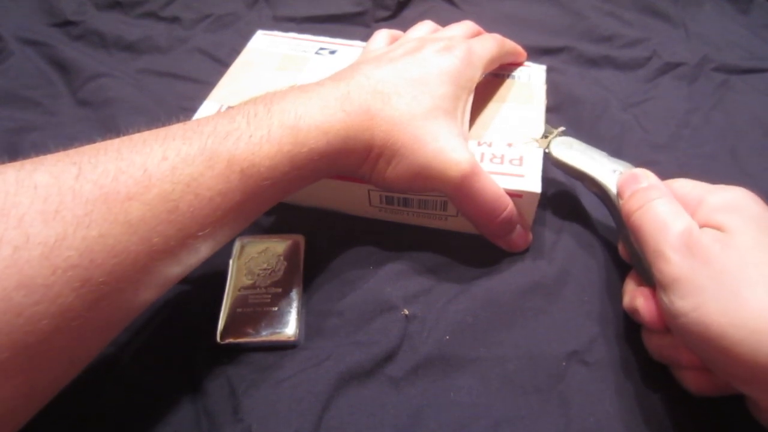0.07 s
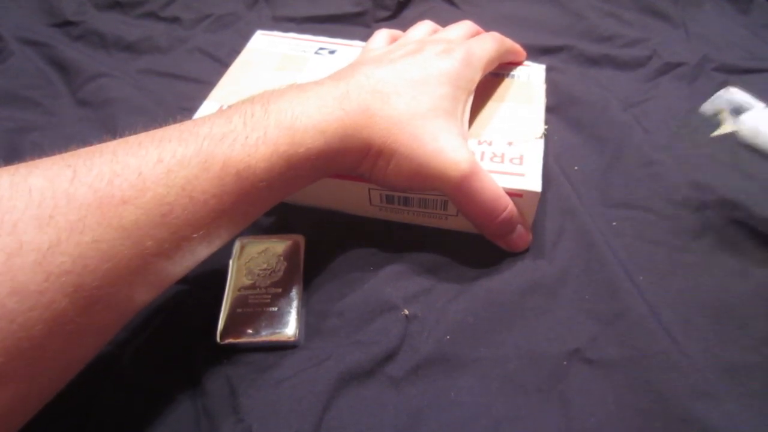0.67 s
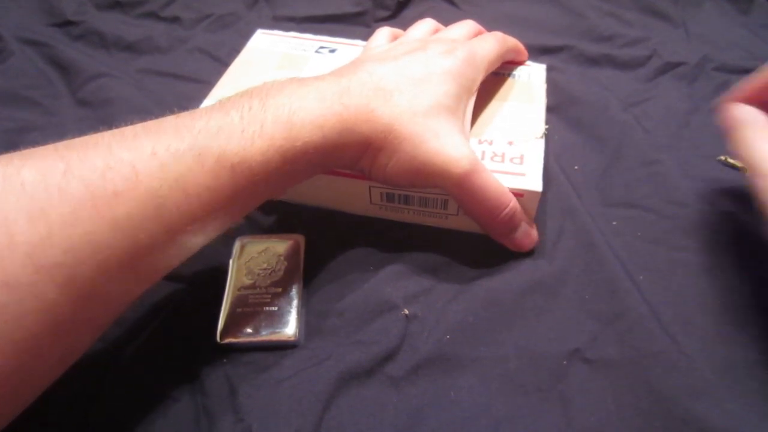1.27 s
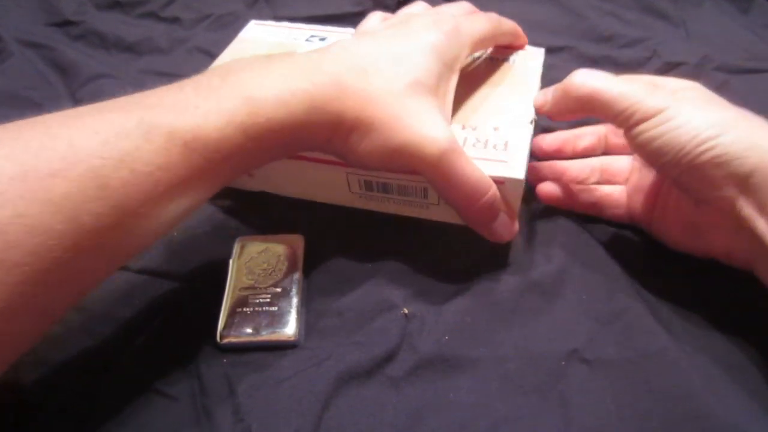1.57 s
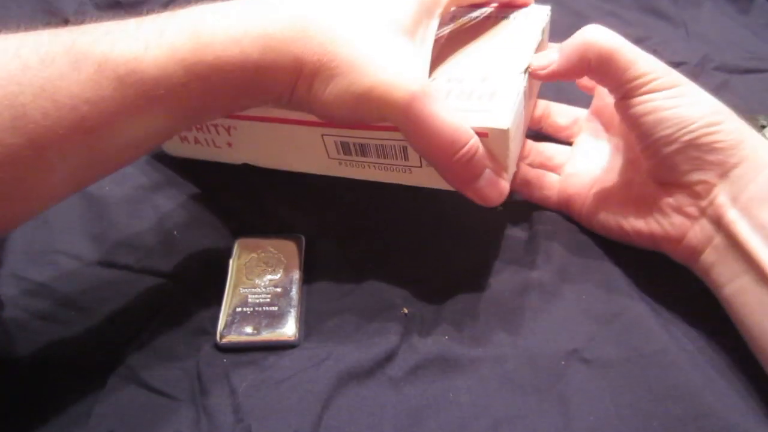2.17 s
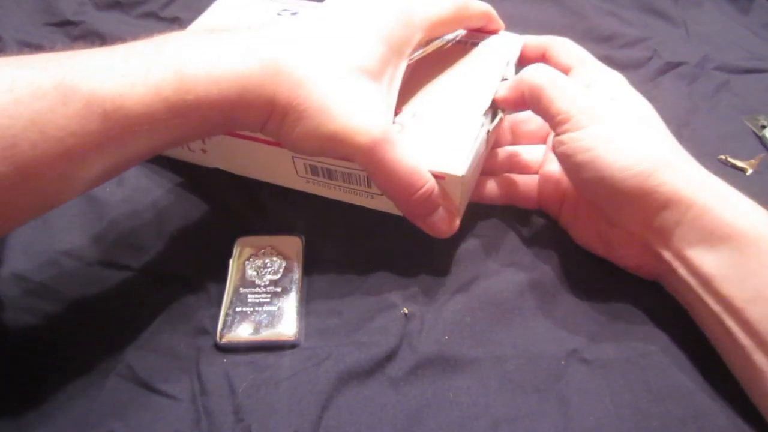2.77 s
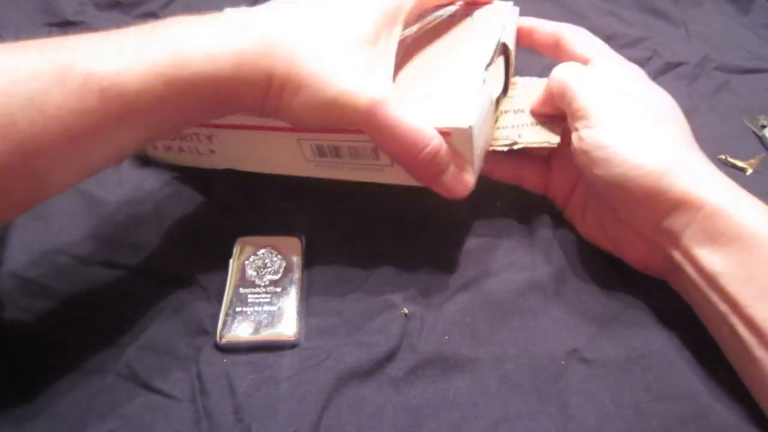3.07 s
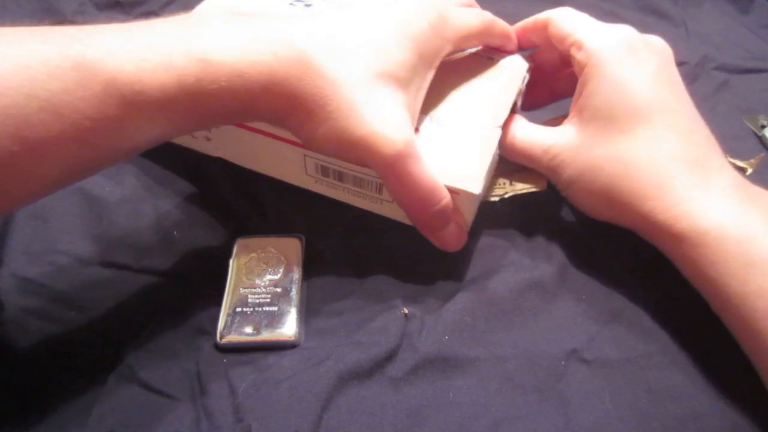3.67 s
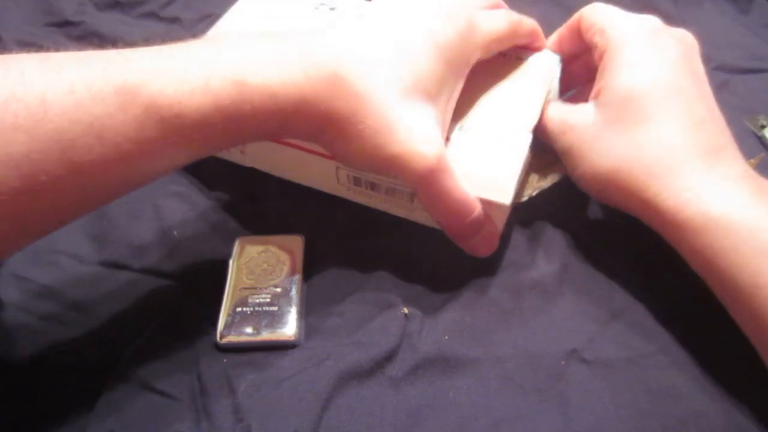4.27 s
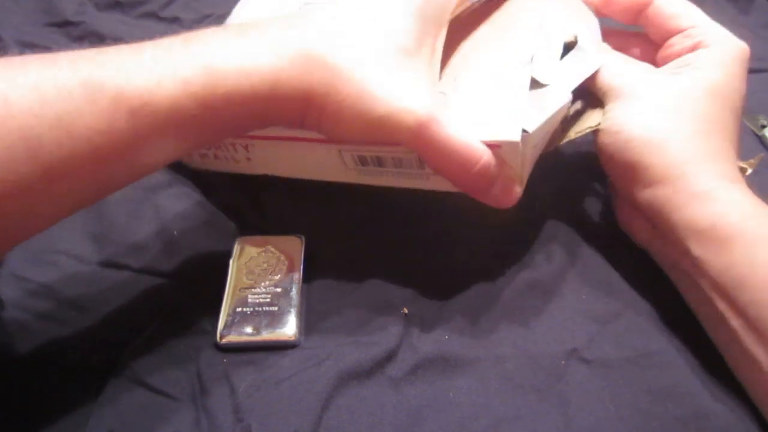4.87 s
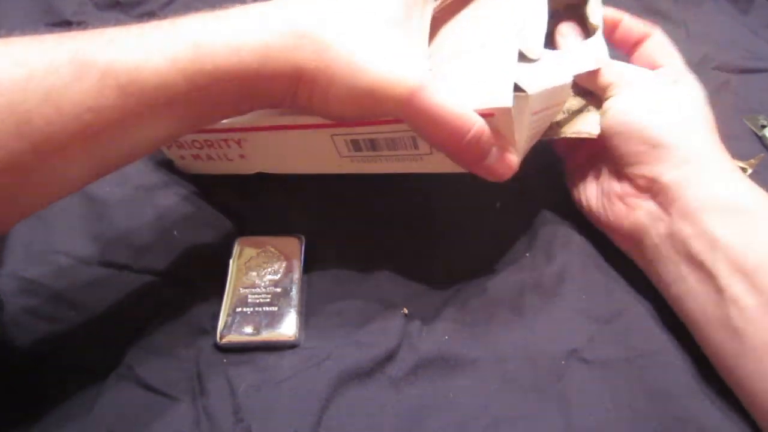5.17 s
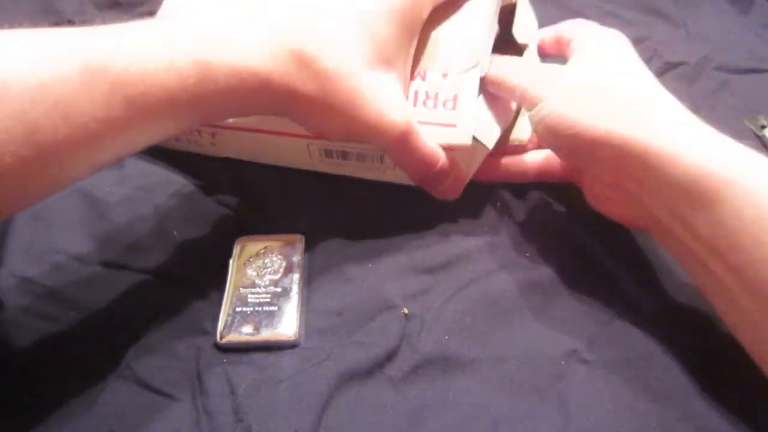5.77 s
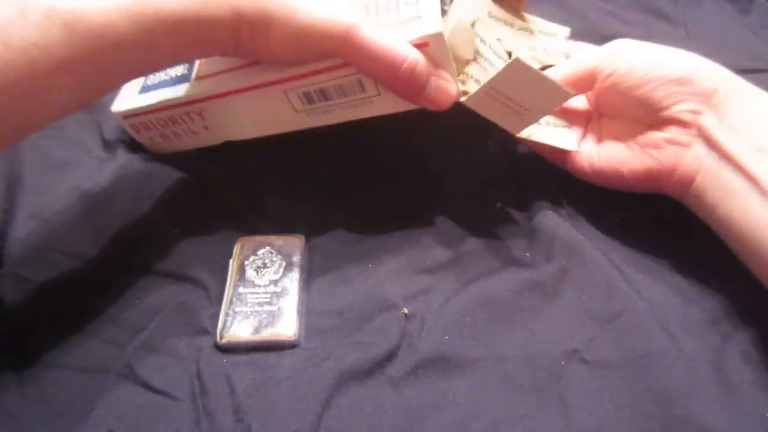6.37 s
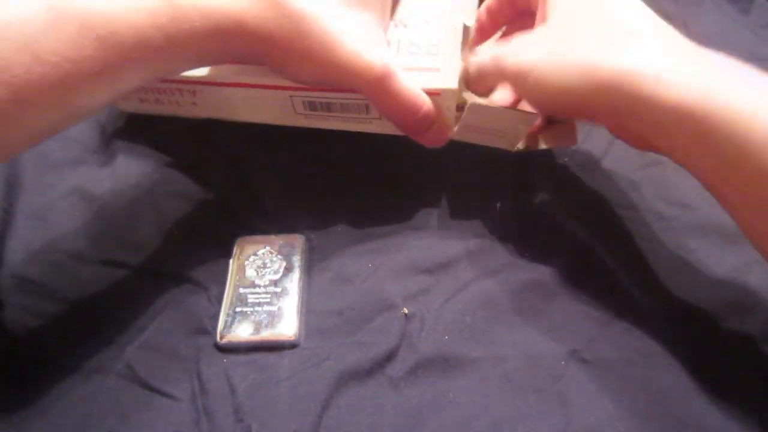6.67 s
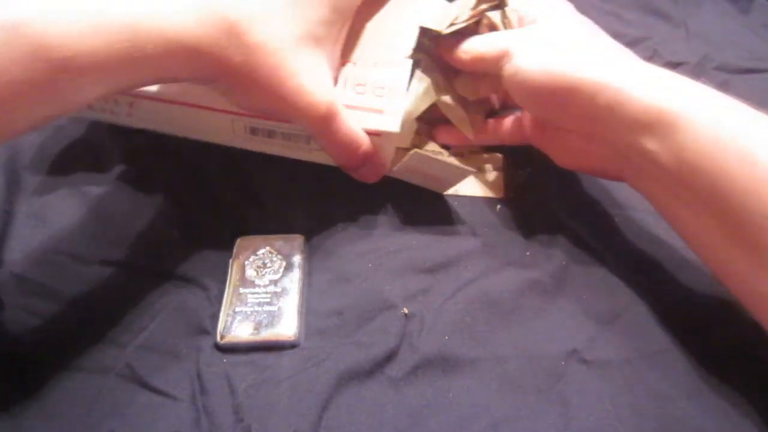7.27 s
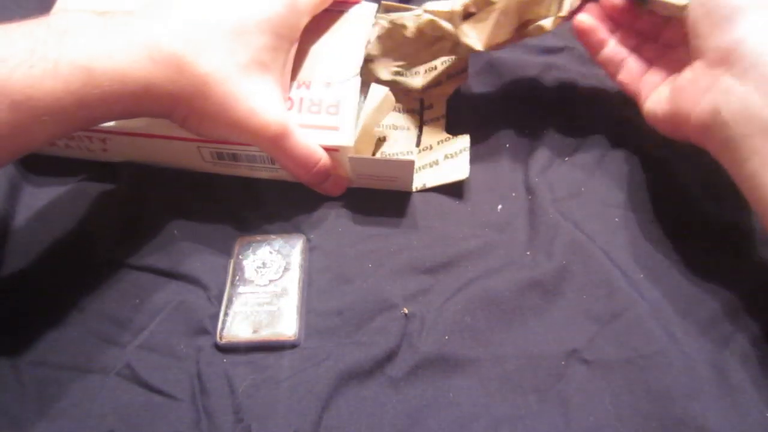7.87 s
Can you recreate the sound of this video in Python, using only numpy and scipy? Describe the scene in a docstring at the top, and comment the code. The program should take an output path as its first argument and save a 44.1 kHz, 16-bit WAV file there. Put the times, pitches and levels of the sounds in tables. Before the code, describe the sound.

A knife briefly rasps through cardboard, then fingers scrape and snap the box open and pull out rustling packing paper.

```python
"""A knife rasps through the end of a cardboard mailing box, scrapes free and rings briefly.
Fingers scrape and pry by stick-slip friction, the glued seal fractures ridge by ridge, and the flaps
buckle open, each release exciting the resonances of flap and box. Last, crumpled packing paper is
dragged out, rustling as its creases flip. The box lies close by on a cloth-covered table, where it
thuds softly; a small room adds a short reverberation and a low noise."""
import sys
import numpy as np
from scipy import signal
from scipy.fft import rfft, irfft, next_fast_len
from scipy.io import wavfile
from scipy.ndimage import map_coordinates

SR = 44100
rng = np.random.default_rng(int(sys.argv[2]) if len(sys.argv) > 2 else 0)


def waveform_to_disk(signal):
    """Save audio, clipped to [-1, 1], as 16-bit WAV at the path in sys.argv[1]."""
    frames = np.transpose(np.atleast_2d(signal))
    scaled = np.clip(frames, -1, 1) * 32767
    samples = np.round(scaled).astype(np.int16)
    wavfile.write(sys.argv[1], SR, samples)


N = 349272
STEP = 32  # samples per step of a stroke's envelope


# modes of the box walls and enclosed air: (frequency [Hz], bandwidth [Hz], gain [dB])
BOX_MODES = [(110, 35, -8), (160, 60, -11), (285, 120, -3), (380, 150, 0), (500, 130, -5)]
# spectrum of breaking fibres: (frequency [Hz], relative level [dB])
CRACK_SPECTRUM = [(1500, 6), (2700, 16), (4200, 9.5), (7000, 8), (9500, 0.5), (11800, -16), (13500, -8),
                  (16000, -28)]
# the cardboard buckles or slips free:
# (time [s], knock level [dB], pop level [dB], crack level [dB], flap frequency [Hz], crush time [s])
SNAPS = [(0.1134, -37, -32, -39, 925, 0.00012), (0.487, -34.5, -32.5, -49, 1270, 0.0043),
         (0.759, -47, -46.5, -64, 760, .0007), (1.2436, -38, -41, -52, 720, 0.00035),
         (1.4597, -31, -24, -46, 714, 0.0002), (1.751, -39, -33.5, -40, 1370, 0.0069),
         (1.819, -40, -48, -66, 815, 0.0035), (1.941, -24.5, -22.5, -33, 796, 0.0024),
         (2.2402, -32, -37.5, -47, 1240, 0.0049), (2.3812, -23.5, -26, -36, 800, 0.0018),
         (2.966, -26, -20, -31, 1186, 0.0028), (3.0198, -24.5, -20.5, -29, 1030, 0.0022),
         (3.583, -23, -27.5, -26.5, 930, 0.0061), (3.6323, -17.5, -21, -28.5, 960, 0.001),
         (3.647, -47, -28.5, -33, 1370, 0.0011), (4.6742, -15, -13.5, -24, 865, 0.005),
         (5.018, -28, -18.5, -27.5, 1270, 0.0013), (5.0312, -24, -20.5, -36, 1010, 0.0028),
         (5.054, -32.5, -25.5, -33, 1240, 0.002), (5.2012, -27, -30, -32, 1410, 0.0012),
         (5.2277, -44, -23.5, -32.5, 1900, 0.0029), (5.2635, -29, -28, -31, 1760, 0.0023),
         (5.427, -27.5, -25.5, -29, 1380, 0.0036), (5.7105, -38, -26.5, -38, 910, 0.0016),
         (5.7585, -32, -15.5, -54, 1370, 0.00022), (5.7608, -17.5, -21, -28, 965, 0.0092),
         (5.9894, -21.5, -10.5, -24.5, 826, 0.00027), (6.1876, -33, -23, -33.5, 900, 0.0057),
         (6.7119, -23, -27.5, -41, 866, 0.004), (6.7603, -23.5, -27, -56, 686, 0.0017),
         (6.8581, -29, -26, -29.5, 670, 0.0077), (7.107, -22.5, -21, -27, 900, 0.002),
         (7.2567, -24, -16, -47, 774, 0.0023), (7.3044, -24.5, -17.5, -48, 726, 0.004),
         (7.795, -32, -22, -30, 790, 0.0059), (7.823, -32, -25, -33, 820, 0.0041),
         (7.844, -80, -26.5, -37, 836, 0.0027), (7.909, -28, -23, -31.5, 825, 0.01)]
def snapping(size=4096):
    """Buckling frees stored elastic energy: the flap pops, the box knocks and fibres crack."""
    out, lead = np.zeros(N), size // 4
    t = (np.arange(size) - lead) / SR
    for s, knock_db, pop_db, crack_db, pop_hz, crush_s in SNAPS:
        # a quick snap is one clean impulse, a slow crush is mostly small slips around it
        fade_s = max(crush_s, 1 / SR) * np.where(t < 0, 0.65, 1)
        drive = 0.26 * np.tanh(crush_s / 0.002) * rng.standard_normal(size) * np.exp(-np.abs(t) / fade_s)
        drive[lead] += 1
        drive = whiten(fold_echoes(drive, echo_db=-8.5, t60=0.012), share=0.3)
        push = top_wall(drive)
        flap = resonate(push, [(pop_hz, 320, 0), (1.35 * pop_hz, 900, -5)])
        pop = amp(pop_db) * burst(band(flap, 568, 2.35 * pop_hz))
        # slow, long bending waves reach the box walls a moment later
        body = np.roll(resonate(push, BOX_MODES), round(0.001 * SR))
        knock = amp(knock_db) * burst(band(body, 120, 900, order=2))
        splinters = whiten(fold_echoes(drive, echo_db=1, t60=0.0041), share=0.45)
        fibres = coloured(splinters, CRACK_SPECTRUM)
        crack = amp(crack_db) * burst(band(fibres, 1100, 24000, order=2))
        add(out, s - lead / SR, pop + knock + crack)
    return out


# spectrum of the tearing seal: (frequency [Hz], relative level [dB])
SEAL_SPECTRUM = [(200, -18), (370, 2), (700, -3.5), (1150, 10), (2000, 0.5), (3000, -1.5), (4200, -7),
                 (6500, -7), (9500, -13.5), (11800, -24.5), (13800, -19), (16000, -32)]
# the seal catches, then gives way in one pull:
# (start [s], duration [s], level [dB], swell [dB], relative hiss [dB], relative body [dB])
RIPS = [(2.938, 0.028, -28.5, -4, 0, -2), (2.967, 0.092, -20.7, -1, -.8, -9.5)]
def ripping(ridges_per_s=155, jerk_decay_s=0.0025):
    """Intermittent fracture: each glued ridge gives way with a jerk and a spray of breaking fibres."""
    levels = stroke_gains(RIPS, attack_s=0.003, release_s=0.011, hiss_release_s=0.013)
    spacing, strength = rng.random((round(2 * ridges_per_s * N / SR), 2)).T
    onsets = np.cumsum(0.5 + spacing) / ridges_per_s
    t = np.arange(N) / SR + onsets[0]
    ridge = np.searchsorted(onsets, t, side="right") - 1
    jerks = amp(4 * strength[ridge]) * (0.3 + np.exp((onsets[ridge] - t) / jerk_decay_s))
    fibres = slips(rate=3500, spread_db=2.5, smooth=0.5)
    return friction(levels, SEAL_SPECTRUM, jerks * fibres, judder_db=1, judder_rate=460)


# spectrum of rubbed cardboard: (frequency [Hz], relative level [dB])
CARDBOARD_SPECTRUM = [(200, -5), (310, -4.5), (600, -4.5), (880, 2), (1200, 6), (1800, -0.5), (3800, -15),
                      (6000, -15), (9500, -23.5), (11800, -41.5), (13500, -34), (16000, -46)]
# the holding hand rubs the box, and torn edges make it hiss: (time [s], level [dB], relative hiss [dB])
GRIP = [(0, -50.5, -21), (.52, -49.5, -10.5), (.9, -65, -5), (1.4, -53, -9.5), (1.87, -60.5, -3),
        (2.2, -58.5, -9), (2.55, -49, -5.5), (3.5, -45, -3.5), (4.21, -55, 2.5), (4.5, -39.5, -5),
        (5.15, -45, -6.5), (5.85, -39.5, -8), (6.1, -47.5, -8.5), (6.3, -48.5, -3.5), (6.65, -62, -4)]
# slides over the cardboard:
# (start [s], duration [s], level [dB], swell [dB], relative hiss [dB], relative body [dB])
RUBS = [(0.0, 0.19, -46, -4, -7, -4.5), (.25, 0.24, -48.5, -11, -12.5, -2.5),
        (.4, 0.072, -35.5, 11, -9.5, -6), (1.47, 0.15, -46.5, -5, -13.5, -7),
        (1.946, 0.026, -34.5, -12, -7, -11.5), (2.04, 0.037, -38, 0.5, -11, -11),
        (2.25, 0.024, -40.5, -2, -9.5, 3), (2.385, 0.029, -36.5, -0.5, -3.5, 5.5),
        (2.63, 0.033, -36, 2, -5, -0.5), (2.68, 0.18, -43.5, -9, -19, 3), (3.33, 0.053, -52, 20, -3, 4),
        (3.565, 0.16, -42, -14, -4, -19), (3.75, 0.19, -44.5, -7.5, -1.5, -1.5),
        (3.997, 0.083, -39.5, 1, 3.5, -4), (4.293, 0.08, -37, -0.5, 0, 1), (4.45, 0.215, -42.5, 18, 2, -8),
        (4.69, 0.042, -36.5, 4.5, -2, -12), (4.803, 0.068, -33, 0, 1, -4),
        (5.018, 0.037, -26, -5, -5, -6.5), (5.208, 0.069, -33.5, -5, -3, -2),
        (5.394, 0.086, -33, -7.5, -7, -3), (5.585, 0.017, -29.5, -1.5, -4, -3.5),
        (5.705, 0.16, -33.5, -19, -7.5, -13), (5.885, 0.081, -34, 18, -7.5, -3.5),
        (6.14, 0.045, -42.5, -10, 0.5, 3.5), (6.365, 0.1, -43, 1, -7, -2), (6.55, 0.019, -51, -1, 3, 6.5)]
def scraping():
    """Stick-slip friction: blade, skin and flap edges cross the cardboard in a fine, dense grain."""
    rubs = stroke_gains(RUBS, attack_s=0.01, release_s=0.027, hiss_release_s=0.019)
    level, hiss = gain_curves(GRIP)
    grip = np.array([0.87 * level, level, hiss * level])
    grain = slips(rate=1700, spread_db=5, smooth=0.95)
    return friction(np.hypot(rubs, grip), CARDBOARD_SPECTRUM, grain, judder_db=1.5, judder_rate=110)


# spectrum of dragged paper: (frequency [Hz], relative level [dB])
PAPER_SPECTRUM = [(200, -7), (370, 0), (600, -9.5), (820, -2.5), (1100, -4.5), (2200, -5), (4000, -13.5),
                  (6500, -14), (9500, -20), (11800, -39), (13300, -32), (16000, -46)]
# tugs at the packing paper:
# (start [s], duration [s], level [dB], swell [dB], relative hiss [dB], relative body [dB])
TUGS = [(6.668, 0.022, -45.5, 9, -0.5, -18), (6.715, 0.16, -34.5, 4.5, -2, -1),
        (6.922, 0.033, -28, 1, -6, -4.5), (7.05, 0.15, -30, 3, -5, -3.5), (7.17, 0.14, -26.5, -1, -1, -5),
        (7.35, 0.17, -39.5, 14.5, -1, -6), (7.525, 0.13, -27.5, 7, -3, -6),
        (7.7, 0.2, -34.5, -5.5, -3.5, -5.5)]
def rustling():
    """Sliding friction: crumpled paper rustles as it drags along the inside of the box."""
    levels = stroke_gains(TUGS, attack_s=0.006, release_s=0.07, hiss_release_s=0.06)
    grain = slips(rate=1700, spread_db=5, smooth=0.6)
    return friction(levels, PAPER_SPECTRUM, grain, judder_db=1.6, judder_rate=120)


# loud creases in the packing paper: (time [s], level [dB])
CREASES = [(6.716, -33), (6.8052, -31), (6.8318, -34.5), (7.009, -40.5), (7.1, -35), (7.328, -29),
           (7.39, -23.5), (7.4273, -25), (7.523, -31.5), (7.565, -30), (7.591, -28), (7.62, -27),
           (7.6498, -29), (7.9009, -34)]
def crinkling():
    """Crackling noise: a few loud creases flip among many small ones in the paper and torn flaps."""
    out = small_creases(TUGS, rate=50, offset_db=-12) + small_creases(RUBS, rate=20, offset_db=-17)
    for s, db in CREASES:
        add(out, s, crease(db, hz=3300 * 2 ** (0.59 * rng.random())))
    return out


def small_creases(strokes, rate, offset_db):
    """Random buckling: creases flip during each stroke, louder where it hisses more."""
    out = np.zeros(N)
    for start, length, db, _, hiss_db, _ in strokes:
        for when, size, octaves in rng.random((round(rate * length), 3)):
            tick_db = db + hiss_db + offset_db + 14 * size ** 2
            add(out, start + when * length, crease(tick_db, hz=3000 * 2 ** octaves))
    return out


def crease(db, hz, size=1024):
    """Snap-through: one crease flips with a bright tick, too light to move the box."""
    flick = rng.standard_normal(size) * amp(-60 * np.arange(size) / SR / 0.008)
    tick = resonate(flick, [(hz, 1.4 * hz, 0), (7800, 2500, -9)])
    return amp(db) * burst(coloured(tick, [(200, -25), (1200, 0), (9000, 0), (11800, -19), (14000, -12)]))


# strokes of the knife: (start [s], duration [s], level [dB], swell [dB])
CUTS = [(0.0, 0.17, -52.5, 18), (0.252, 0.071, -43, 8), (0.378, 0.095, -39, 10)]
def slicing():
    """Forced vibration: the blade saws through fibres and the end flap rasps in one hollow band."""
    teeth = slips(rate=1600, spread_db=-4, smooth=0.37)
    sawing = per_sample(sum(stroke(*cut, attack_s=0.014, release_s=0.01) for cut in CUTS))
    return sawing * unit(band(teeth, 680, 1050, order=2))


# spectrum of the edge leaving the cut: (frequency [Hz], relative level [dB])
ZIP_SPECTRUM = [(2500, -18), (5000, -7), (6500, 2.5), (9800, -6), (11800, -21), (14500, -17)]
# modes of the blade: (frequency [Hz], level [dB], 60 dB decay time [s])
BLADE_MODES = [(1210, -39, 0.16), (1950, -37, 0.32), (2155, -38, 0.21), (4580, -52, 0.28)]
def blade_release(exit_s=0.483):
    """Free vibration: the blade scrapes out with a bright zip and rings on in its damped modes."""
    out, t = np.zeros(N), np.arange(SR // 2) / SR
    # the blade sits loose in its handle, which roughens the ring
    ring = sum(amp(db - 60 * t / t60) * np.sin(2 * np.pi * hz * t + wobble(130)[:len(t)])
               for hz, db, t60 in BLADE_MODES)
    add(out, exit_s, ring * (1 - np.exp(-t / 0.0036)))
    edge = unit(coloured(rng.standard_normal(len(t)), ZIP_SPECTRUM))
    envelope = np.exp(-((t - 0.013) / 0.011) ** 2) + amp(-7.5) * np.exp(-t / 0.041)
    add(out, exit_s, amp(-34) * edge * envelope)
    return out


# creaks of the bent flap: (time [s], level [dB])
CREAKS = [(5.0198, -28), (5.202, -31.5), (5.228, -31)]
def creaking(hz=5180, bandwidth_hz=650, slip_s=0.0015, size=1024):
    """Resonance: a brief burst of slips in the fold rings one narrow, bright mode."""
    out, t = np.zeros(N), (np.arange(size) - size // 2) / SR
    fold = [(hz, bandwidth_hz, 0)]
    for s, db in CREAKS:
        rubbing = rng.standard_normal(size) * np.exp(-(t / slip_s) ** 2)
        ring = resonate(resonate(rubbing, fold), fold)
        add(out, s - size / 2 / SR, amp(db) * burst(ring))
    return out


# dry ticks of the strained cardboard: (time [s], level before filtering [dB])
STRAIN_TICKS = [(.6275, -56), (1.656, -60), (3.432, -44), (4.116, -36), (4.982, -36), (5.832, -34)]
def straining(fibre_count=35):
    """Acoustic emission: the gripped box flexes, giving a few clear ticks and many faint fibre clicks."""
    out, grip = np.zeros(N), gain_curves(GRIP)[0]
    for s, db in STRAIN_TICKS:
        tick = crease(db, hz=2200 * 2 ** (0.5 * rng.random()))
        add(out, s, band(tick, 500, 7500, order=1))
    for when, size, octaves in rng.random((fibre_count, 3)):
        s = when * GRIP[-1][0]
        add(out, s, grip[int(s * SR)] * crease(-15 + 14 * size ** 2, hz=4000 * 2 ** octaves))
    return out


# pushes against the table: (time [s], level [dB], half-width [s], sway frequency [Hz])
BUMPS = [(.5, -34, 0.057, 160), (1.18, -34, 0.14, 110), (6.742, -29, 0.019, 114),
         (6.922, -27.5, 0.0093, 111), (7.297, -32, 0.035, 130), (7.789, -28.5, 0.12, 105.5)]
def jostling(size=8192):
    """Compliant contact: soft pushes against the cloth excite only the lowest sway of the box."""
    out, t = np.zeros(N), (np.arange(size) - size // 2) / SR
    for s, db, half_width_s, hz in BUMPS:
        push = rng.standard_normal(size) * np.exp(-(t / half_width_s) ** 2)
        add(out, s - size / 2 / SR, amp(db) * burst(band(push, 0.83 * hz, 1.3 * hz)))
    return out


def slips(rate, spread_db, smooth):
    """A Poisson process: about rate tiny releases a second, unequal in size, over a smooth rub."""
    happens = rng.random(N) < rate / SR
    size = amp(spread_db * np.minimum(rng.standard_exponential(N), 3.5))
    sign = np.sign(rng.standard_normal(N))
    return unit(unit(happens * size * sign) + smooth * rng.standard_normal(N))


def friction(levels, spectrum, drive, judder_db, judder_rate):
    """Broadband excitation: clumps of slips shake the box body, the sheet and its fibres together."""
    clumps = drive * amp(judder_db * wobble(judder_rate))
    sound = moving_contact(coloured(clumps, spectrum))
    bands_hz = [(212, 600), (600, 2500), (2500, 18000)]  # body, scrape, hiss
    return sum(gain * unit(band(sound, lo, hi)) for gain, (lo, hi) in zip(levels, bands_hz))


def stroke(start, length, db, swell_db, attack_s, release_s, arch_db=0.5):
    """Level follows sliding speed: a slide's gain ramps by swell_db and arches in its faster middle."""
    t = np.arange(0, N, STEP) / SR - start
    position = np.clip(t / length, 0, 1) - 0.5
    pressing = amp(db + swell_db * position + arch_db * (np.cos(np.pi * position) - 2 / np.pi))
    # a slide that is loudest at its start has broken loose suddenly
    rise_s = attack_s * amp(1.5 * min(swell_db, 0))
    return pressing * np.exp(np.minimum(t, 0) / rise_s - np.maximum(t - length, 0) / release_s)


def stroke_gains(strokes, attack_s, release_s, hiss_release_s):
    """Incoherent sources add in power: the gains of body, scrape and hiss for a run of strokes."""
    power = 0
    for s, length, db, swell_db, hiss_db, body_db in strokes:
        scrape = stroke(s, length, db, swell_db, attack_s, release_s)
        hiss = stroke(s, length, db + hiss_db, swell_db, attack_s, hiss_release_s)
        power = power + np.array([amp(body_db) * scrape, scrape, hiss]) ** 2
    return per_sample(np.sqrt(power))


def moving_contact(x, size=4096):
    """A plate's response depends on the driving point, so its ring changes as the contact travels."""
    hop = size // 2
    padded = np.pad(x, (hop, size))
    out = np.zeros(len(padded))
    for start in range(0, N + hop, hop):
        piece = padded[start:start + size] * signal.get_window("hann", size)
        out[start:start + size] += top_wall(fold_echoes(piece, echo_db=-6.5, t60=0.013))
    return out[hop:hop + N]


def fold_echoes(x, echo_db, t60, size=1024):
    """Multiple reflection: bending waves bounce between the folds for a few milliseconds."""
    t = np.arange(size) / SR
    response = rng.standard_normal(size) * amp(-60 * t / t60) * (1 - np.exp(-t / 0.00047))
    response *= amp(echo_db) / np.linalg.norm(response)
    response[0] = 1  # the direct wave
    return signal.fftconvolve(x, response)[:len(x)]


# response of the broad top wall: (frequency [Hz], gain [dB])
WALL_RESPONSE = [(480, 7.5), (590, 1.5), (740, 5.5), (920, 4), (1250, -3.5), (1500, -0.5)]
def top_wall(x):
    """Plate radiation: the wall colours the sound, its resonances shifting as the hand flexes it."""
    flex = np.exp(0.03 * rng.standard_normal())
    return coloured(x, np.array(WALL_RESPONSE) * [flex, 1])


# reverberation of the small room: (frequency [Hz], 60 dB decay time [s])
ROOM_DECAY = [(150, 0.32), (1000, 0.51), (3000, 0.33), (10000, 0.12)]
def reverberation(x, delay_s=0.00398):
    """A diffuse field decays exponentially: a short, soft tail in which the treble dies first."""
    hz, t, noise = signal.stft(rng.standard_normal(SR // 2), SR, nperseg=256)
    decay = amp(-60 * t / along(ROOM_DECAY, hz)[:, None])
    tail = signal.istft(noise * decay, SR, nperseg=256)[1]
    tail = coloured(tail / np.linalg.norm(tail), [(150, 12.5), (1000, -1.5), (2500, 5.5), (8000, -24)])
    return signal.fftconvolve(np.pad(x, (round(delay_s * SR), 0)), tail)[:N]


# spectrum of the quiet room: (frequency [Hz], relative level [dB])
NOISE_SPECTRUM = [(28, -11), (80, -10), (400, -18), (850, -26), (8000, -50), (11800, -61), (16000, -59)]
def room_noise():
    """Stationary noise: a faint floor, strongest in the bass."""
    return amp(-52) * unit(coloured(rng.standard_normal(N), NOISE_SPECTRUM, size=8192))


def resonate(x, modes):
    """Modal superposition: drive resonances given as (frequency [Hz], bandwidth [Hz], gain [dB])."""
    size = next_fast_len(2 * len(x))
    f = np.fft.rfftfreq(size, 1 / SR)
    response = sum(amp(db) * 1j * f * width / (hz * hz - f * f + 1j * f * width)
                   for hz, width, db in modes)
    return irfft(rfft(x, size) * response, size)[:len(x)]


def coloured(x, spectrum, size=1024):
    """Minimum-phase filtering by a curve of (frequency [Hz], gain [dB])."""
    cepstrum = irfft(np.log(amp(along(spectrum, np.fft.rfftfreq(size, 1 / SR)))))
    cepstrum[1:size // 2] *= 2
    cepstrum[size // 2 + 1:] = 0
    return signal.fftconvolve(x, irfft(np.exp(rfft(cepstrum))))[:len(x)]


def whiten(x, share):
    """Partial whitening evens out peaks and notches, so that a burst clicks without a pitch."""
    spectrum = rfft(x)
    return irfft(spectrum / (np.abs(spectrum) + 1e-9) ** share, len(x))


def band(x, lo, hi, order=3):
    """Causal band-pass filtering from lo to hi [Hz]."""
    sections = signal.butter(order, [lo, min(hi, SR / 2 - 1)], "band", fs=SR, output="sos")
    return signal.sosfilt(sections, x)


def wobble(rate):
    """Random modulation: a smooth curve with rate knots a second."""
    return map_coordinates(rng.standard_normal(int(N * rate / SR) + 4), [np.arange(N) * rate / SR])


def gain_curves(rows):
    """Interpolation in decibels: a gain per sample for each level column, silent outside the rows."""
    times, *columns = np.transpose(rows)
    return [amp(np.interp(np.arange(N) / SR, times, db, left=-120, right=-120)) for db in columns]


def along(points, hz):
    """Interpolation of (frequency [Hz], value) points on a logarithmic frequency axis."""
    frequencies, values = np.transpose(points)
    return np.interp(np.log(hz + 1), np.log(frequencies + 1), values)


def per_sample(gain):
    """Zero-order hold: each gain value lasts STEP samples."""
    return np.repeat(gain, STEP, axis=-1)[..., :N]


def amp(db):
    """Amplitude ratio of a level in decibels."""
    return 10 ** (np.asarray(db) / 20)


def unit(x):
    """Power normalisation to rms 1."""
    return x / np.sqrt(np.mean(x ** 2) + 1e-20)


def burst(x):
    """Energy normalisation to that of 10 ms at rms 1."""
    return x * np.sqrt(0.01 * SR / (np.sum(x ** 2) + 1e-20))


def add(track, s, sound):
    """Superposition of a sound on the track at time s."""
    start = round(s * SR)
    track[start:start + len(sound)] += sound[:N - start]


def scene():
    """Superposition of the direct handling sounds, their reverberation and the room's noise."""
    strokes = slicing() + blade_release() + scraping() + ripping() + rustling() + jostling()
    hits = snapping() + creaking() + crinkling() + straining()
    floor = room_noise()
    tail = reverberation(amp(-18) * hits + amp(-18.5) * strokes)
    return (strokes + hits + tail + floor)[None]


def record(dry, cutoff_hz=16200):
    """Hard clipping at full scale, then band limiting: nothing passes above the cutoff."""
    size = next_fast_len(N + SR // 2)
    spectrum = rfft(np.clip(dry, -1, 1), size)
    return irfft(spectrum * (np.fft.rfftfreq(size, 1 / SR) < cutoff_hz), size)[:, :N]


dry = scene()
out = record(dry)
waveform_to_disk(out)
```